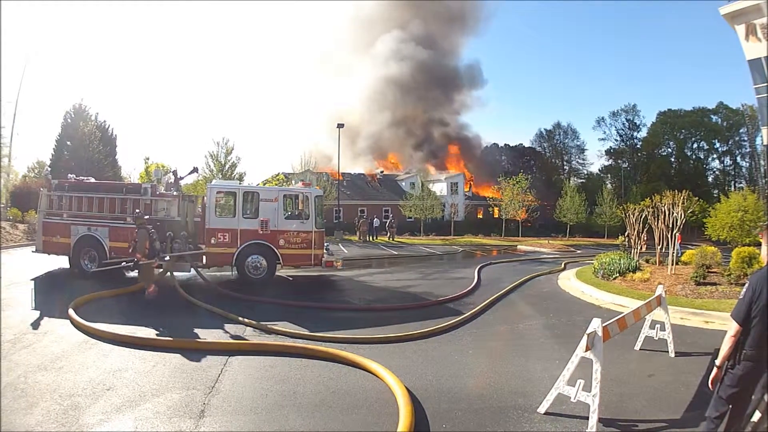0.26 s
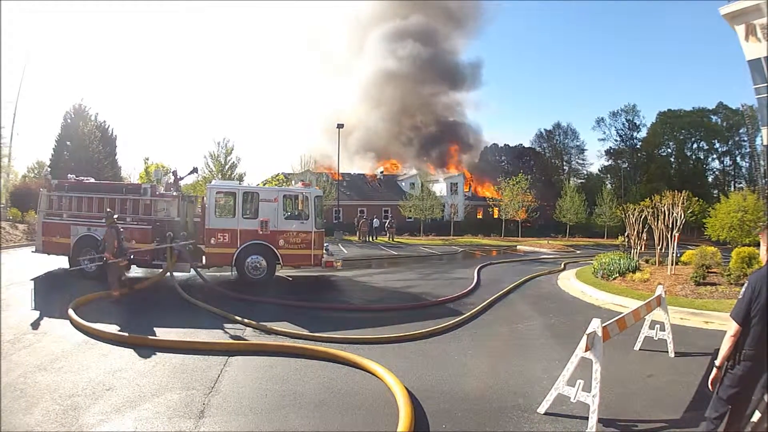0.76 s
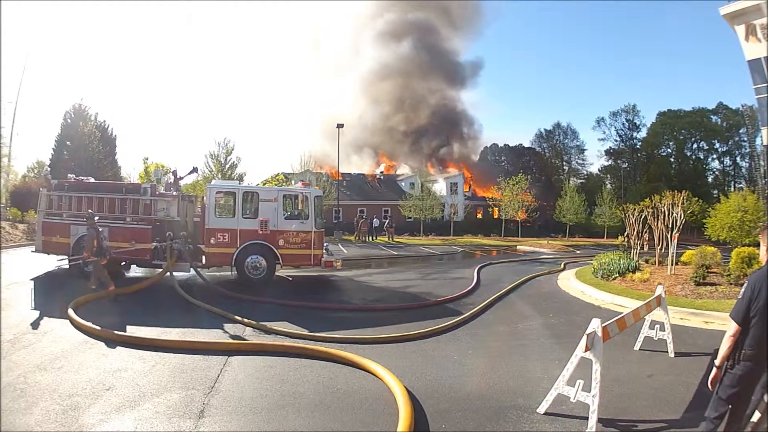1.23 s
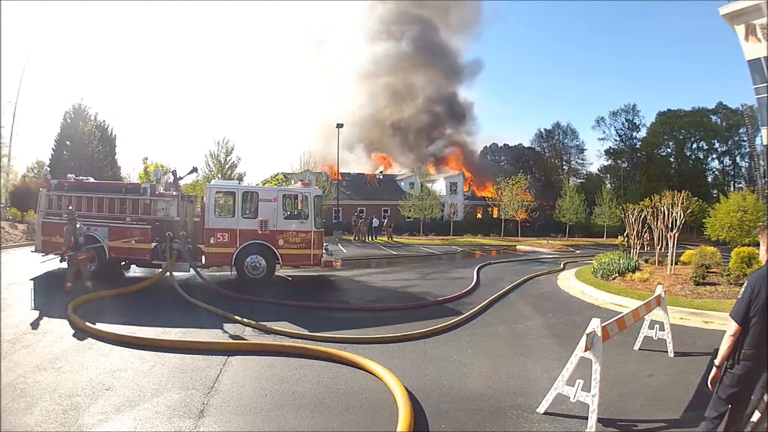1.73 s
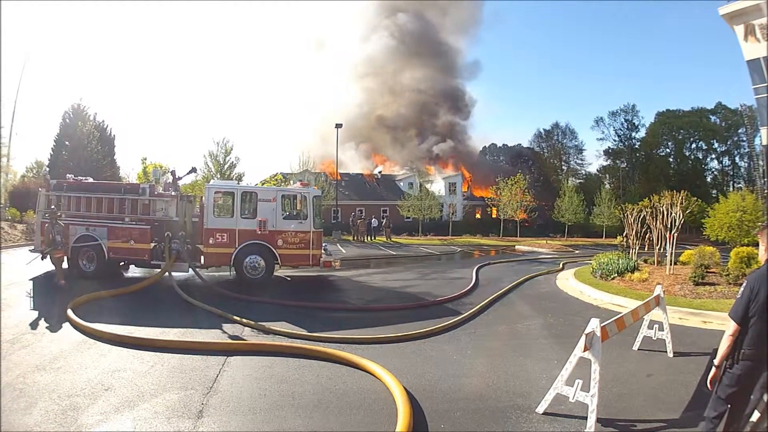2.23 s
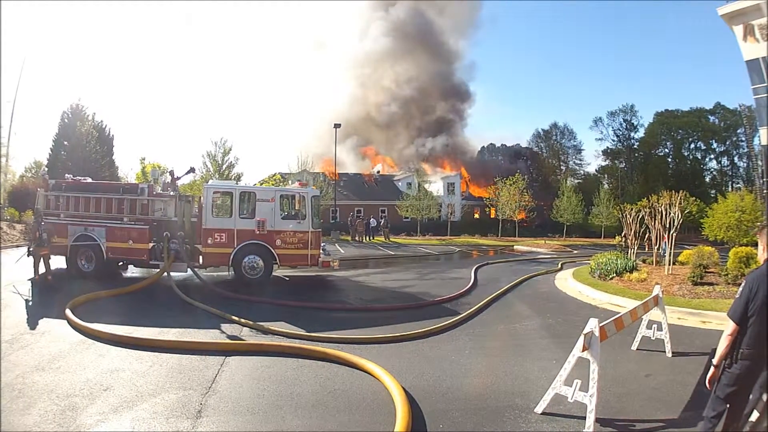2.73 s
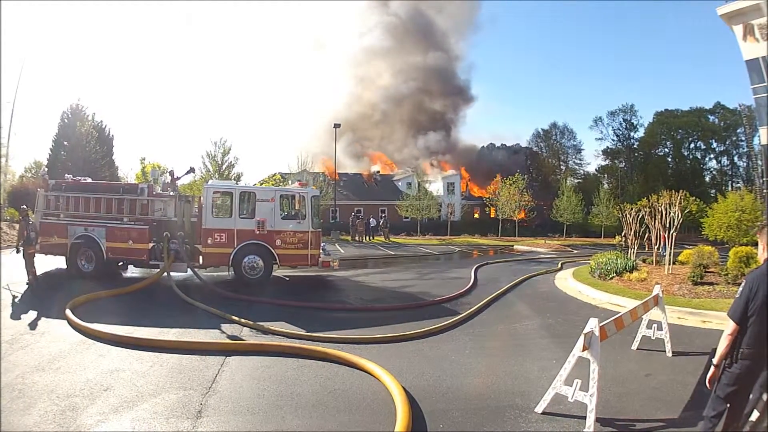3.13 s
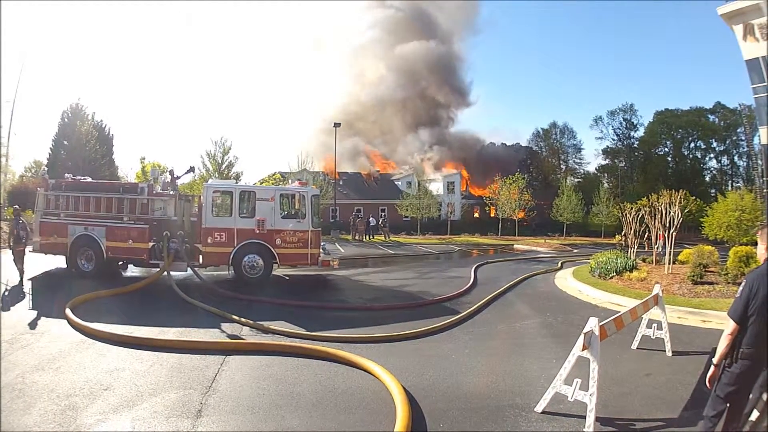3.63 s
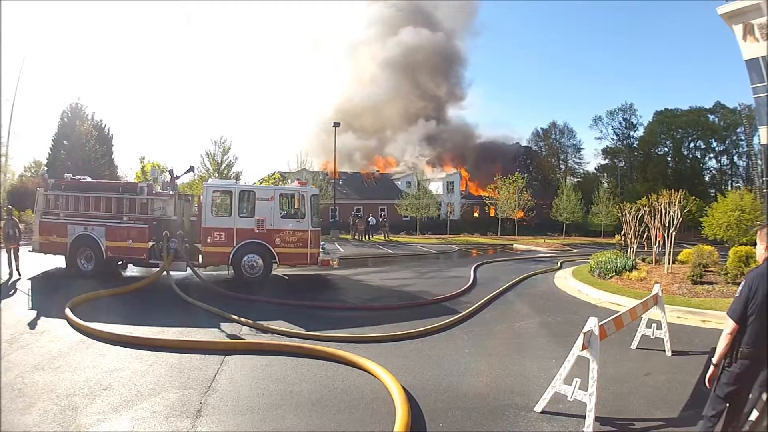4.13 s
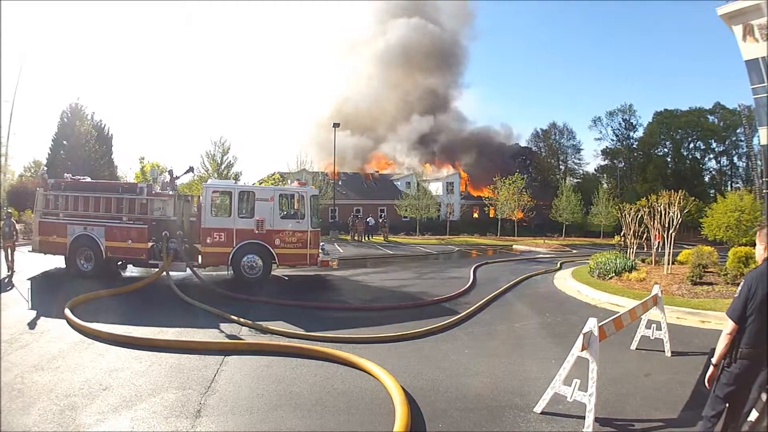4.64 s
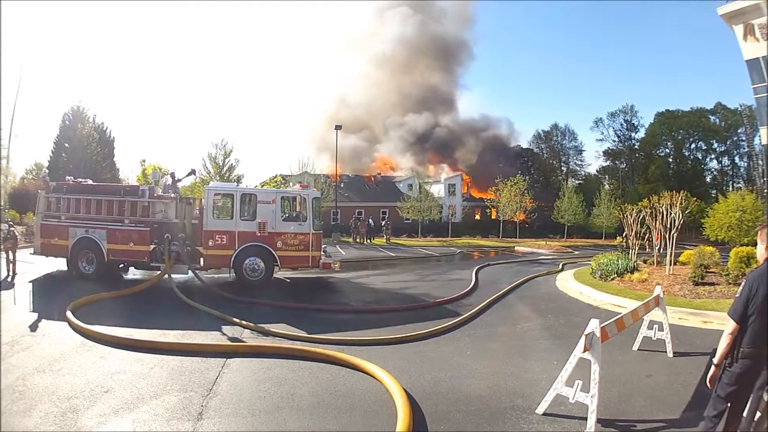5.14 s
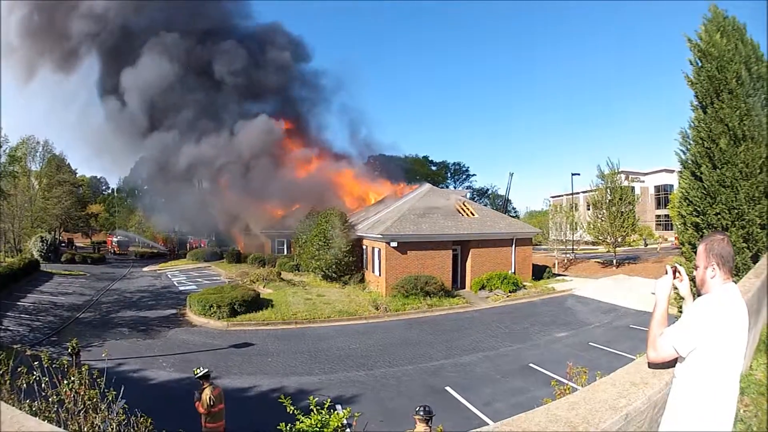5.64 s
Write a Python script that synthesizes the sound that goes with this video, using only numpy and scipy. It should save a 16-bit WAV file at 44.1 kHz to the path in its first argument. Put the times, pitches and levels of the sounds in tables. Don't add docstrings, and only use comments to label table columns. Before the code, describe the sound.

A diesel fire engine drones steadily outdoors amid hiss and small metal ticks, then handling knocks bang the microphone and the scene turns to distant roar.

```python
import sys
import numpy as np
from scipy import signal
from scipy.fft import rfft, irfft, next_fast_len
from scipy.io import wavfile
from scipy.ndimage import uniform_filter1d

SR = 44100
rng = np.random.default_rng(int(sys.argv[2]) if len(sys.argv) > 2 else 0)


def level_to_linear(level):
    exponent = np.asarray(level, float) / 20
    return 10 ** exponent


def store_wav(level_fs):
    pcm = np.round(np.clip(np.atleast_2d(level_fs), -1, 1) * 32767)
    wavfile.write(sys.argv[1], SR, pcm.T.astype(np.int16))


N = 259749
CUT_S, BACK_S = 5.3243, 5.3603


def on_log(hz, table):
    points, db = np.transpose(table)
    return np.interp(np.log(np.maximum(hz, 1)), np.log(points), db)


def colour(x, table):
    size = next_fast_len(2 * len(x))
    gain = level_to_linear(on_log(np.fft.rfftfreq(size, 1 / SR), table))
    cepstrum = irfft(np.log(gain), size)
    cepstrum[1:size // 2] *= 2
    cepstrum[size // 2 + 1:] = 0
    return irfft(rfft(x, size) * np.exp(rfft(cepstrum)), size)[:len(x)]


def hiss(table):
    return colour(rng.standard_normal(N), table) * np.sqrt(SR / 2)


def unit(x):
    return x / np.std(x)


def walk(rate):
    k = int(SR / rate)
    steps = np.repeat(rng.standard_normal(N // k + 1), k)
    return unit(uniform_filter1d(uniform_filter1d(steps, k), k)[:N])


def ring(x, hz, t60):
    pole = np.exp(2j * np.pi * hz / SR - np.log(1000) / (t60 * SR))
    return signal.lfilter([1], [1, -pole], x).imag


def swell(s, rise, fall, db):
    t = np.arange(N) / SR - s
    return level_to_linear(db) * np.exp(-(t / np.where(t < 0, rise, fall)) ** 2)


def add(out, s, db, shape):
    i = int(s * SR)
    shape = shape[:N - i]
    out[i:i + len(shape)] += level_to_linear(db) * shape / np.abs(shape).max()


def pumper():
    cycle_hz, points = 10.017, 8192
    # multiple of the cycle rate, level in dB rms.
    strong_orders = [(6, -64), (9, -50), (10, -64), (12, -60), (13, -74), (15, -65), (20, -70), (24, -76),
                     (41, -77), (54, -69), (69, -72), (73, -71), (78, -77), (81, -75), (82, -79), (88, -78),
                     (95, -81), (98, -78), (102, -77), (103, -78), (106, -74), (111, -80), (123, -81),
                     (136, -85), (148, -86), (149, -84), (157, -81), (160, -80), (170, -85)]
    # frequency in Hz, level of an order in dB rms.
    clatter = [(40, -81), (300, -86.5), (700, -83.5), (1100, -85), (1700, -96.5), (2600, -121),
               (4000, -110)]
    k = np.arange(1, 513)
    db = on_log(k * cycle_hz, clatter) + 4.0 * rng.standard_normal(len(k))
    for order, order_db in strong_orders:
        db[int(order) - 1] = order_db
    spectrum = level_to_linear(db) * np.exp(2j * np.pi * rng.random(len(k)))
    cycle = irfft(np.r_[0, spectrum], points) * points / np.sqrt(2)
    crank = cycle_hz * np.arange(N) / SR + 0.001 * walk(3.3)
    return np.interp(crank % 1, np.arange(points) / points, cycle, period=1) * level_to_linear(.7 * walk(4))


def second_truck():
    # frequency in Hz, wander in Hz, level in dB rms.
    smeared_lines = [(119, .5, -65.5), (160, 4.1, -68.5), (197.3, 0.24, -65), (208, 5.1, -68),
                     (318, 4.8, -66), (361, 1.5, -71.5), (395.7, 4, -69.5), (523.5, 4.7, -67),
                     (700, 18, -69), (2650, 210, -67)]
    # peak time in seconds, half length in seconds, level in dB, pitch in Hz.
    hum_surges = [(0.004, 0.03, -58, 306), (0.383, .06, -53.5, 288.2), (0.645, .15, -63.5, 290.5),
                  (1.041, 0.076, -53, 293.3), (1.847, .05, -60, 294), (2.036, .06, -60.5, 290),
                  (2.25, 0.33, -61, 290.5), (3.006, .045, -52, 297), (3.283, .04, -65.5, 294),
                  (3.666, 0.039, -56, 293), (3.82, .04, -61, 289.5), (4.05, 0.13, -58, 291.5),
                  (4.798, .08, -59.5, 290)]
    # peak time in seconds, half length in seconds, level in dB.
    panel_calls = [
        (0.104, 0.031, -59),
        (0.472, 0.099, -68),
        (1.2, 0.31, -73),
        (1.756, 0.057, -67),
        (3.002, .04, -67),
        (3.91, .05, -66),
        (4.672, .06, -66),
    ]
    rest_hz, panel_hz = 291.0, 436.5
    loose = np.zeros(N)
    for hz, width, db in smeared_lines:
        loose += level_to_linear(db) * unit(ring(rng.standard_normal(N), hz, np.log(1000) / (np.pi * width)))
    rest = level_to_linear(-65 + 2.5 * walk(9))
    surges = [swell(s, half, half, db) for s, half, db, _ in hum_surges]
    load = rest + sum(surges)
    hum_hz = (rest * rest_hz + sum(g * row[3] for g, row in zip(surges, hum_surges))) / load
    hum = np.sqrt(2) * load * np.sin(2 * np.pi * (np.cumsum(hum_hz) / SR + 0.016 * walk(23)))
    shake = level_to_linear(-69 + 2.6 * walk(3.9))
    shake = shake + sum(swell(s, half, half, db) for s, half, db in panel_calls)
    panel = np.sqrt(2) * shake * np.sin(2 * np.pi * (panel_hz * np.arange(N) / SR + 0.16 * walk(17)))
    return loose + hum + panel


def fans_and_spray():
    # frequency in Hz, density in dB per Hz.
    roar = [(5, -100), (12, -60.5), (50, -78), (130, -77), (300, -85.5), (520, -93), (600, -94), (720, -89),
            (1200, -92), (3000, -98.5), (6000, -100.5)]
    return hiss(roar) * level_to_linear(0.45 * walk(14))


def ticks():
    # time in seconds, peak of the middle in dB, low part relative to it in dB.
    coupling = [(0.3483, -51, -10), (0.4499, -46, -1.5), (0.4502, -37.5, -29), (0.559, -54, -8),
                (0.616, -56, 0), (0.783, -57, -18), (0.9532, -44, -8), (1.1756, -55, -10),
                (1.4107, -55.5, -4), (1.6616, -53, -13), (1.721, -41.5, -7.5), (2.0971, -45.5, -7),
                (2.5157, -53, -13), (2.5351, -48.5, -16), (2.8815, -50.5, -10), (2.974, -44.5, -8.5),
                (3.0914, -53, -17), (3.2188, -43.5, -7.5), (3.2335, -44.5, -11), (3.4535, -53, -10),
                (3.4701, -49, -8), (3.7653, -57, -10), (4.1622, -46.5, -7), (4.1959, -54.5, -1),
                (4.2418, -50, -7), (4.9302, -41.5, -22)]
    far_coupling = [
        (5.5288, -56, -0.5),
        (5.6753, -53, -10),
    ]
    # time in seconds, peak in dB.
    valve = [(0.3476, -49.5), (0.4497, -49), (0.4499, -34), (0.6165, -49), (0.8949, -46), (0.9522, -55),
             (1.3638, -49), (1.4701, -47.5), (1.954, -49), (2.0961, -50), (2.4364, -47), (2.9514, -51),
             (2.9718, -45), (3.014, -44), (3.2181, -42), (3.2328, -39.5), (3.7663, -45.5), (3.9629, -48),
             (4.128, -51), (4.1944, -57), (4.211, -38), (4.241, -48), (4.3849, -46), (4.7097, -47.5),
             (4.8948, -49), (4.9282, -39)]
    late_valve = [
        (5.1567, -50),
        (5.1816, -44.5),
        (5.2126, -48),
        (5.309, -39.5),
        (5.3702, -51),
        (5.6057, -66),
        (5.6531, -65.5),
        (5.6744, -53),
        (5.8331, -53),
        (5.8631, -49.5),
    ]
    per_second, patter_db, scatter_db = 12, -56, 3.0
    out, t = np.zeros(N), np.arange(400) / SR
    when, size = rng.random((int(per_second * CUT_S), 2)).T
    patter = list(zip(when * CUT_S, patter_db + scatter_db * (2 * size - 1)))
    full = coupling + far_coupling + [(s, db, -9) for s, db in patter[::2]]
    rows = [(s, db + 0.6, (3000, 4400)) for s, db, _ in full]
    rows += [(s, db + low_db + 8.0, (1000, 2900)) for s, db, low_db in full]
    rows += [(s, db - 0.5, (4400, 6400)) for s, db in valve + late_valve + patter[1::2]]
    for (s, db, band), chance in zip(rows, rng.standard_normal((len(rows), len(t)))):
        burst = np.sign(chance) * np.exp(-t / 0.0036)
        band_pass = signal.butter(2, band, "band", fs=SR, output="sos")
        add(out, s - .0003, db, signal.sosfilt(band_pass, burst))
    return out


def thuds():
    # time in seconds, peak in dB, frequency in Hz.
    blows = [
        (0.577, -39, 296),
        (2.542, -40, 223),
        (2.972, -38.5, 710),
        (3.015, -42, 750),
        (3.084, -45, 316),
        (3.215, -49, 190),
        (4.577, -44, 314),
        (4.645, -42, 256),
        (4.93, -44, 700),
    ]
    out, t = np.zeros(N), np.arange(2000) / SR
    for s, db, hz in blows:
        add(out, s, db, np.sin(2 * np.pi * hz * t) * t * np.exp(-t * hz / 0.71))
    return out


def drag():
    scrape = 2.976, .004, .19
    # frequency in Hz, t60 in seconds.
    hollow = [(530, 0.037), (720, 0.045), (1020, .03)]
    grit = rng.standard_normal(N) * level_to_linear(2.1 * walk(90))
    return swell(*scrape, -54.5) * unit(sum(unit(ring(grit, hz, t60)) for hz, t60 in hollow))


def hand():
    # frequency in Hz, density in dB per Hz.
    skin = [(300, -3), (800, 0.5), (1100, 7), (1350, -1.5), (1650, 7), (1900, 4), (2300, 7.5), (3000, 3),
            (3700, 0.5), (4300, -8.5), (5800, -24)]
    # time of most pressure in seconds, rise in seconds, fall in seconds, level in dB,
    # fine hiss in dB.
    strokes = [
        (4.9, 0.071, .03, -71, 7),
        (4.933, .006, .01, -52.5, 6),
        (5.04, 0.11, .015, -55, 0),
        (5.17, 0.1, 0.14, -56.5, 5),
        (5.274, .02, 0.04, -55, 16.5),
        (5.305, 0.02, 0.02, -47.5, 5),
        (5.42, 0.02, 0.037, -53.5, 2),
        (5.46, 0.041, 0.047, -48.5, -18),
    ]
    # time in seconds, rise in seconds, fall in seconds, level in dB.
    shakes = [(4.77, 0.035, 0.029, -48.5), (4.9, 0.11, .06, -58), (5.04, 0.13, 0.0057, -46),
              (5.075, .008, 0.016, -42), (5.1, .02, 0.011, -41), (5.146, 0.014, 0.008, -29),
              (5.179, 0.013, 0.015, -40), (5.23, 0.044, 0.047, -43.5), (5.31, 0.033, 0.037, -33),
              (5.369, 0.011, .015, -60), (5.44, 0.038, 0.076, -48)]
    rub = unit(hiss(skin) * level_to_linear(1.3 * walk(200)))
    fine = hiss([(2000, -50.5), (4000, 12.5), (5000, -0.5), (6500, 0)])
    fine = unit(fine * level_to_linear(2.0 * walk(110))) * level_to_linear(-12)
    rumble = unit(hiss([(8, -23), (25, 9.5), (90, -2.0), (220, -7.5), (400, -26), (2000, -71.5)]))
    slides = sum(swell(*row[:4]) * (rub + level_to_linear(row[4]) * fine) for row in strokes)
    return slides + rumble * sum(swell(*row) for row in shakes)


def knocks():
    # time in seconds, peak in dB, bounce delay in seconds, bounce in dB, rattle in dB.
    contacts = [
        (5.0544, 4.5, 0.00222, -3.5, -8),
        (5.1064, -17, 0.0033, -10, -6),
        (5.1293, -5, 0.00111, -9, -14),
    ]
    # frequency in Hz, level in dB, t60 in seconds.
    case_modes = [(280, -13, .13), (380, 6, 0.009), (980, 4, 0.0066), (1320, 1, 0.0035), (2210, 1, 0.0055),
                  (2950, -10, 0.004), (3650, -4.5, 0.0045), (4750, -18, .002)]
    # time in seconds, peak in dB, frequency in Hz.
    air_pushes = [
        (5.1301, -13, 80),
        (5.172, -33, 110),
        (5.267, -46, 70),
        (5.317, -33.5, 81),
    ]
    contact_s, rattle_s, low_cut_hz = .00005, .0016, 230
    out, t = np.zeros(N), np.arange(4000) / SR
    chances = rng.standard_normal((len(contacts), len(t)))
    for (s, db, bounce, bounce_db, rattle_db), chance in zip(contacts, chances):
        blow = np.exp(-(t / contact_s - 3) ** 2)
        blow = blow + level_to_linear(bounce_db) * np.exp(-((t - bounce) / contact_s - 3) ** 2)
        blow = blow + level_to_linear(rattle_db) * np.diff(chance, prepend=0) * np.exp(-t / rattle_s)
        tilt_db = (4.6 - .19 * db) * np.log2(np.array(case_modes)[:, 0] / 1000)
        body = sum(level_to_linear(g + lift) * ring(blow, hz, t60) for (hz, g, t60), lift in zip(case_modes, tilt_db))
        add(out, s, db, signal.lfilter(*signal.butter(2, low_cut_hz, "high", fs=SR), body))
    for s, db, hz in air_pushes:
        u = (np.pi * hz * (t - t.mean())) ** 2
        add(out, s - t.mean(), db, (1 - 2 * u) * np.exp(-u))
    return out


def far_trucks():
    # frequency in Hz, density in dB per Hz.
    far_roar = [(5, -100), (20, -77), (70, -67), (150, -82.5), (400, -87.5), (900, -96.5), (1050, -91),
                (1250, -103), (2000, -100), (3300, -102), (4500, -102), (6000, -101)]
    # frequency in Hz, t60 in seconds.
    pitches = [(1570, 0.023), (2460, 0.016), (3770, .015)]
    # time in seconds, rise in seconds, fall in seconds, level in dB.
    whine_calls = [
        [(5.53, 0.0091, .015, -62), (5.71, .02, 0.098, -66.5), (5.81, .06, 0.072, -71.5)],
        [(5.56, 0.03, 0.091, -68), (5.678, 0.0087, 0.0093, -61.5), (5.75, 0.044, 0.15, -69.5)],
        [(5.535, .01, .012, -67.5), (5.678, 0.018, .015, -70)],
    ]
    far = level_to_linear(-2) * hiss(far_roar)
    for (hz, t60), calls in zip(pitches, whine_calls):
        whine = unit(ring(rng.standard_normal(N), hz, t60))
        far = far + sum(swell(*call) for call in calls) * whine
    return far


def through_ports(outside):
    # frequency in Hz, gain in dB.
    ports = [(1000, -3), (1400, -4.5), (1600, 0), (1900, -1), (2650, 5), (3100, 2), (3750, 4.5),
             (4150, -2.5), (4550, -4.5), (5050, 0.5), (5500, -8.5)]
    return colour(outside, ports)


def scene():
    before = np.arange(N) / SR < CUT_S
    near = pumper() + level_to_linear(-1.86) * (second_truck() + fans_and_spray())
    outside = np.where(before, near, far_trucks()) + ticks() + thuds() + drag()
    return (through_ports(outside) + hand() + knocks())[None]


def roll_off(x):
    return signal.sosfilt(signal.butter(12, 16430, fs=SR, output="sos"), x)


def record(dry):
    # frequency in Hz, gain in dB.
    converter = [(5000, 0.5), (5500, 5), (5800, 1), (6000, -1.5), (6400, -62)]
    # frequency in Hz, gain in dB.
    top_cut = [(15200, 2.5), (15330, 13), (15900, -44), (16400, -56)]
    t = np.arange(N) / SR
    taken = np.tanh(signal.resample_poly(colour(dry[0], converter), 40, 147))
    held = signal.resample_poly(np.repeat(taken, 4), 147, 160)[:N]
    offset = (t > BACK_S) * level_to_linear(-42.5) * np.exp(-np.abs(t - BACK_S) / .015)
    held = np.r_[held[1:], 0] + offset
    live = (t < CUT_S) | (t > BACK_S)
    idle_hiss = level_to_linear(-103) * unit(hiss([(100, -1), (16000, 4)]))
    out = live * held + ~live * idle_hiss
    return roll_off(colour(out, top_cut)[None])


dry = scene()
out = record(dry)
store_wav(out)
```